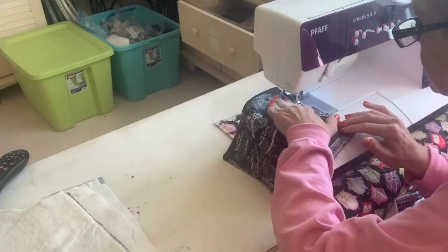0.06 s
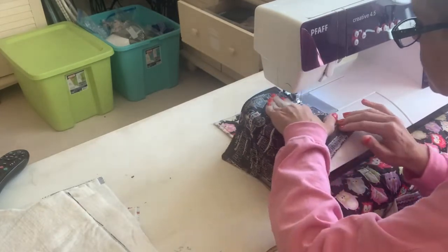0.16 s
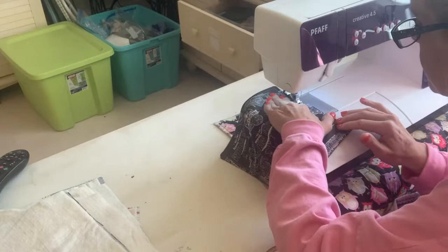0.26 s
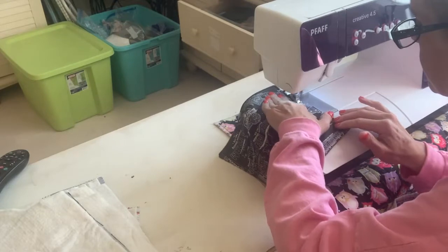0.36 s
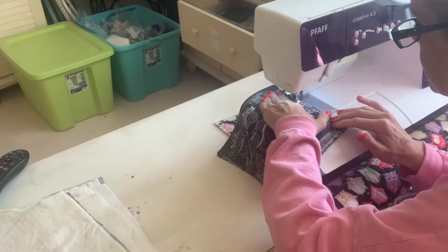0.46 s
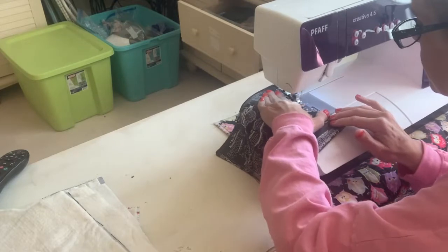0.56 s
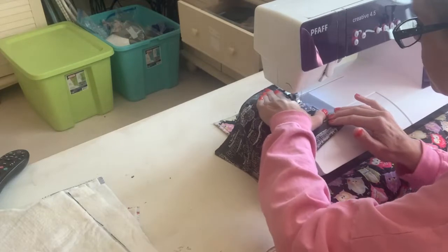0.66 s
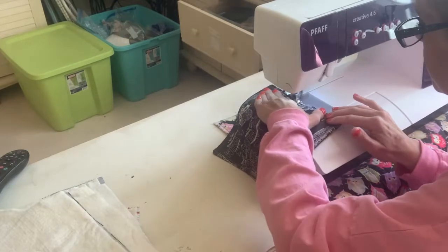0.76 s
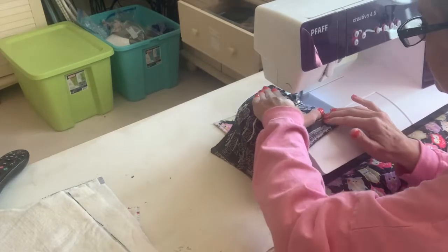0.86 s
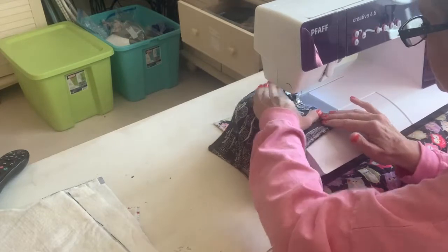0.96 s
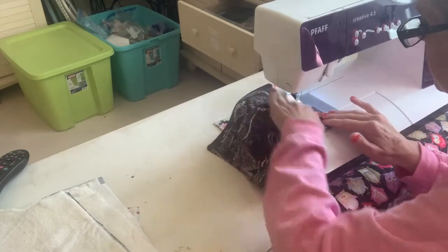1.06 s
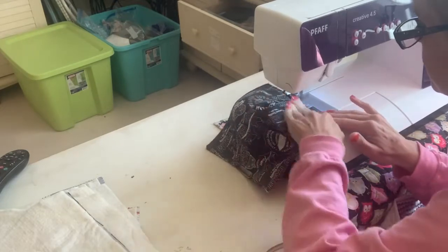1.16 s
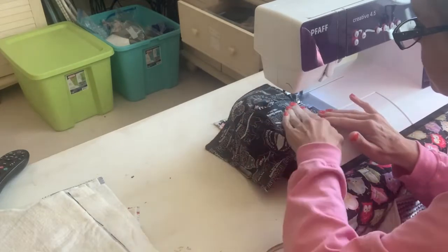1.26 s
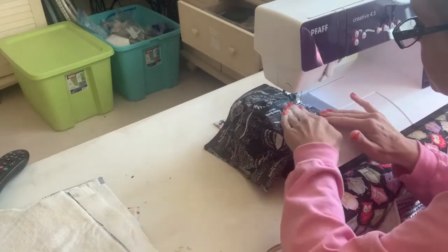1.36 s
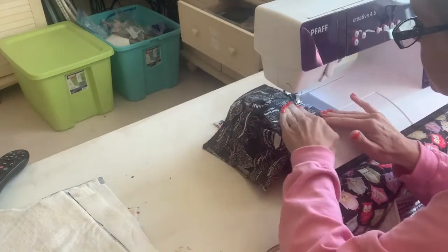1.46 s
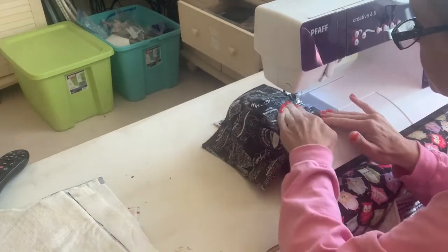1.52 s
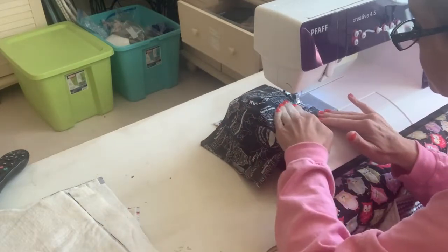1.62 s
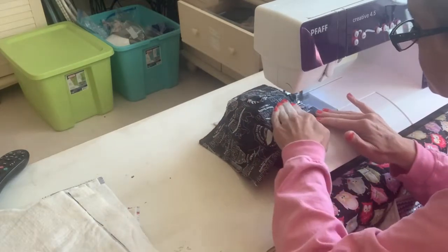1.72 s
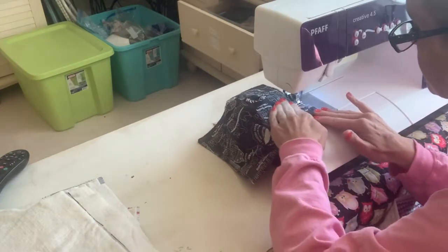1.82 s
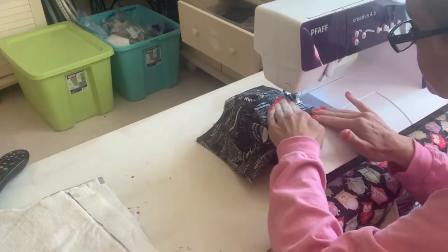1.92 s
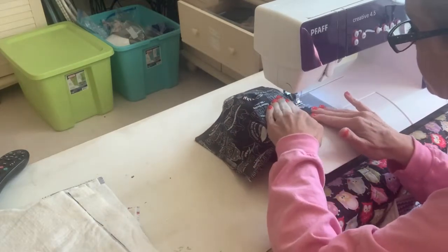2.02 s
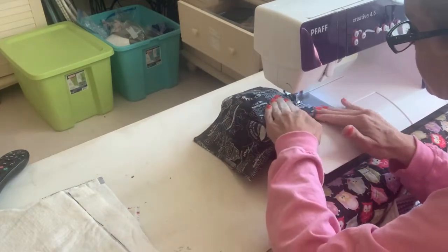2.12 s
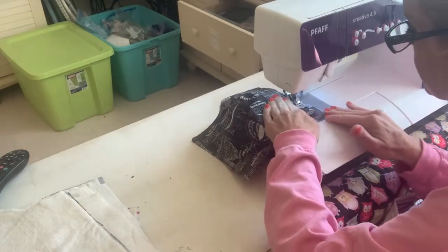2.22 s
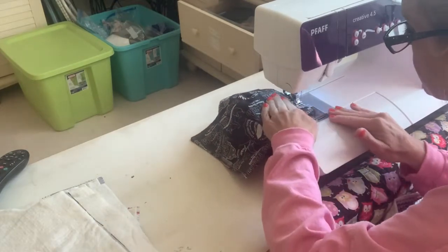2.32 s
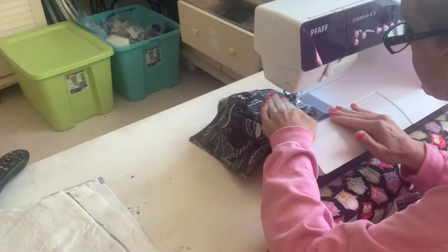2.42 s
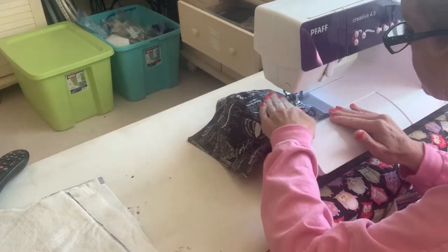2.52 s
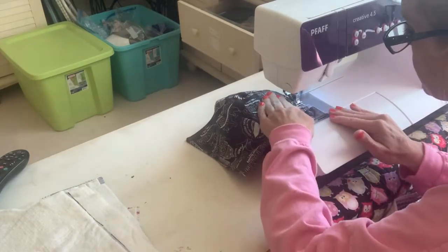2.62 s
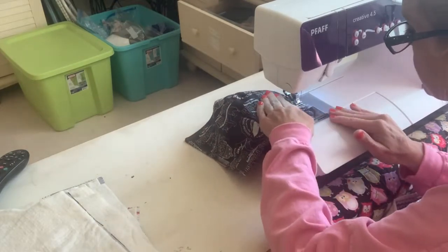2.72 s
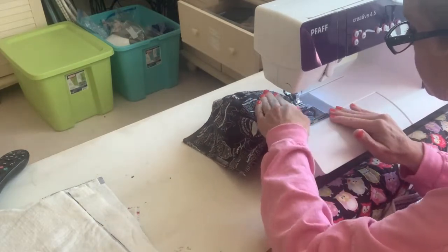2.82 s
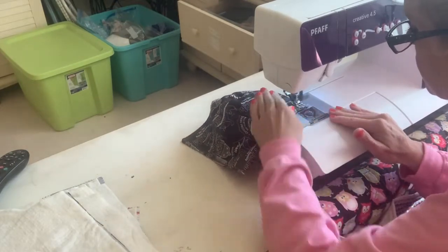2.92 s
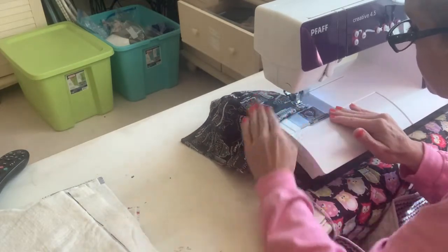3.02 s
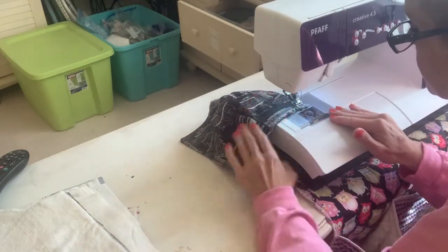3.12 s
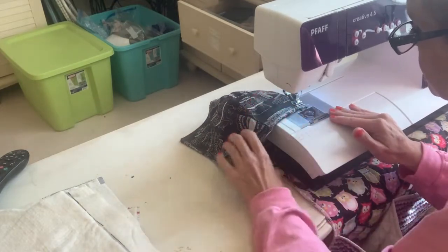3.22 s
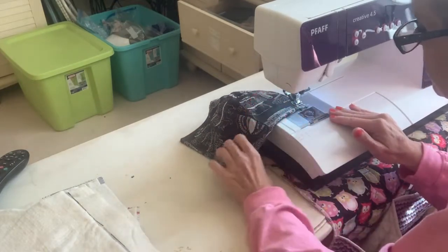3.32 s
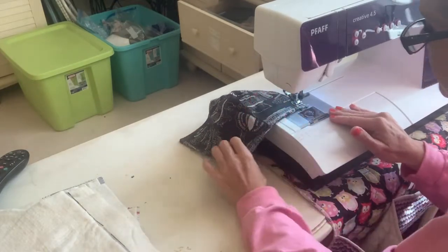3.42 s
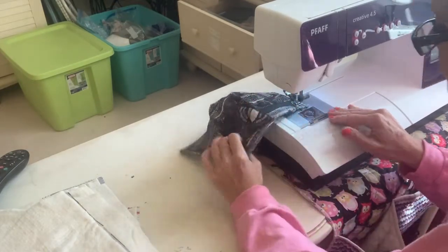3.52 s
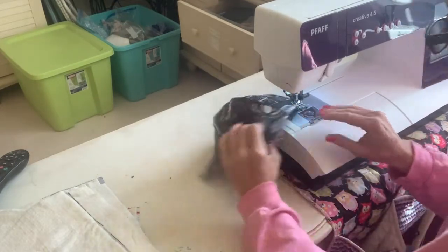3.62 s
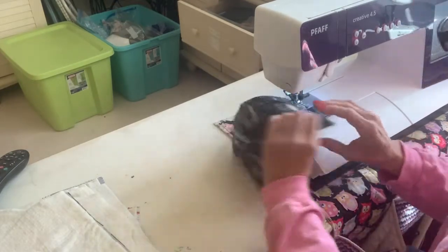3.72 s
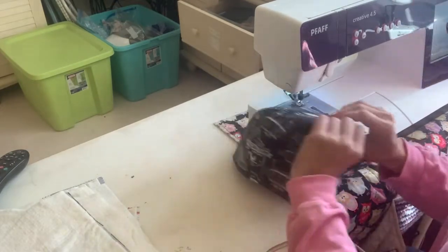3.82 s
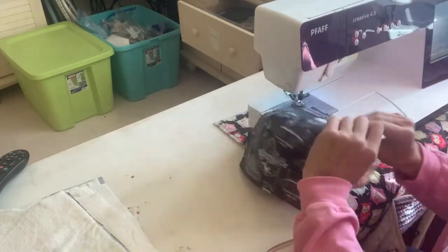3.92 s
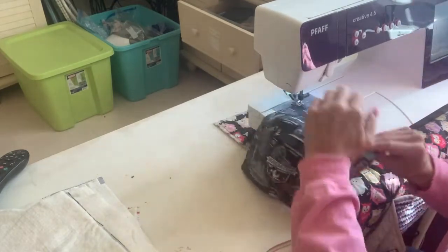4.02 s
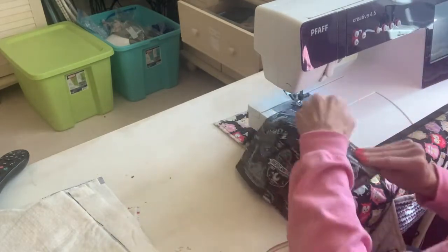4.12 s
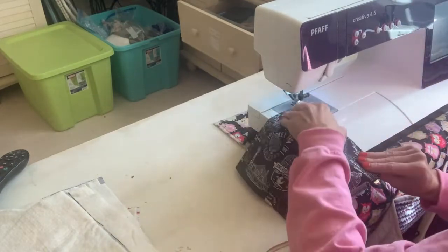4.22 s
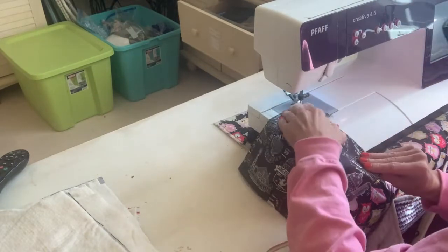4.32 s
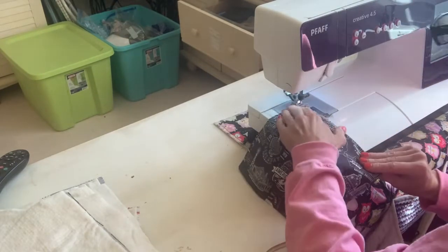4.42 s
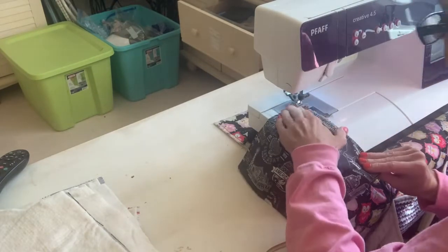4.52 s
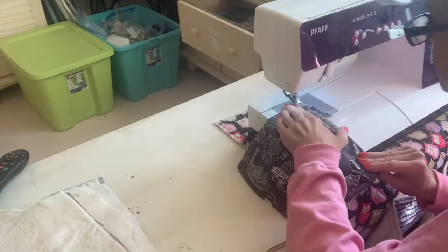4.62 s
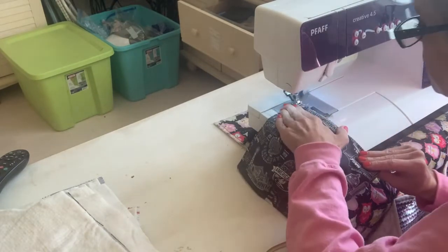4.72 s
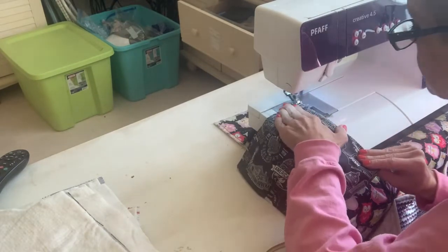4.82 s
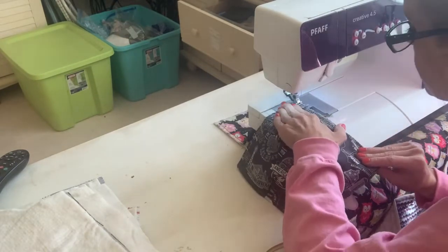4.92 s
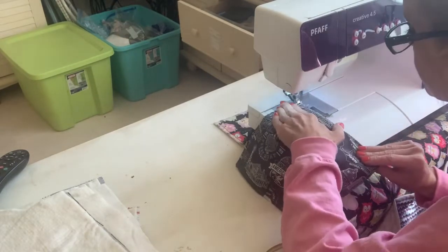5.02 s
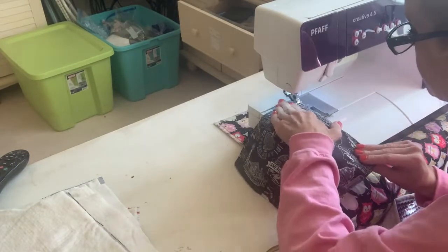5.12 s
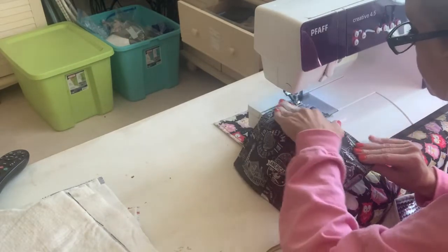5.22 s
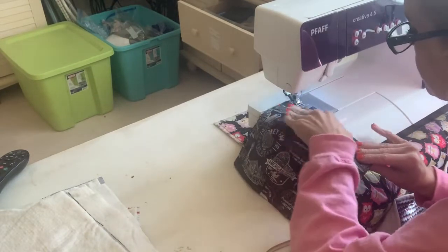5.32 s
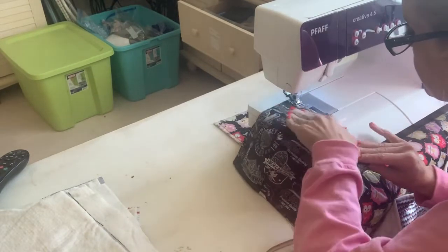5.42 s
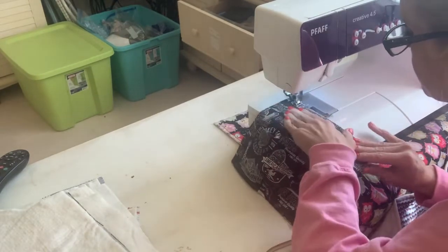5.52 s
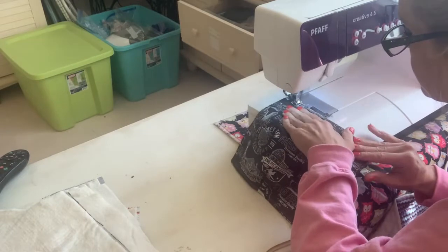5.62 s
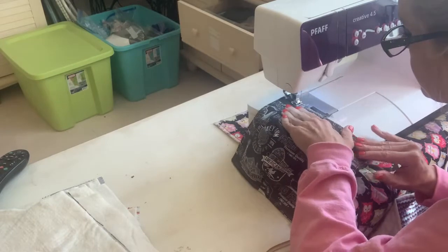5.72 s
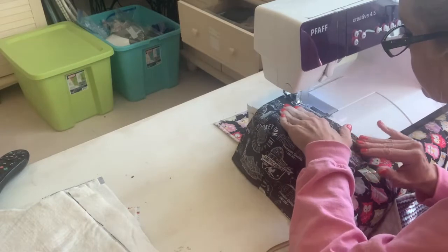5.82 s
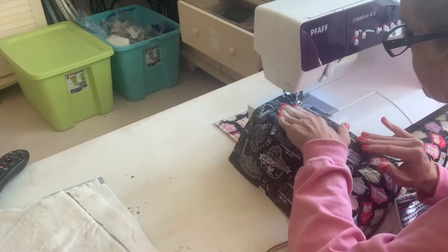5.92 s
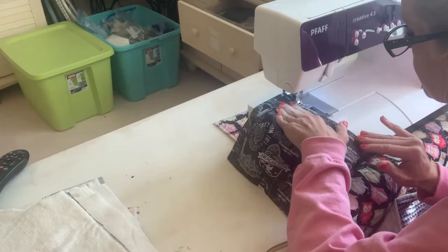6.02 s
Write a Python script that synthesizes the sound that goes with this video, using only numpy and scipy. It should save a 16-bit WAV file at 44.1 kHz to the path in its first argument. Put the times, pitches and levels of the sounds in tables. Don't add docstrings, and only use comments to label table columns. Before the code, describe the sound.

Close indoor stereo of a domestic sewing machine stitching fast and evenly, a dense rattle with motor whine and bright thread ticking. Around three seconds it brakes quickly to a stop. Hands drag cloth over the table and machine parts clack, then the motor winds up to the same steady rattle. The machine is stronger and brighter on the left, duller and more scattered on the right.

```python
import sys
import numpy as np
from scipy import signal
from scipy.fft import rfft, irfft, next_fast_len
from scipy.io import wavfile
from scipy.ndimage import uniform_filter1d, map_coordinates

SR = 44100
rng = np.random.default_rng(int(sys.argv[2]) if len(sys.argv) > 2 else 0)


def transcribe(signal):
    frames = np.atleast_2d(signal).T
    limited = np.clip(frames, -1, 1)
    pcm = np.round(limited * 32767).astype(np.int16)
    wavfile.write(sys.argv[1], SR, pcm)


def rack_gain(trim_db):
    fader = np.asarray(trim_db, float)
    return 10 ** (fader / 20)


N = 267246


def unit(x):
    return x / np.sqrt(np.mean(x ** 2) + 1e-20)


def along(points, hz):
    f, v = np.transpose(points)
    return np.interp(np.log(hz + 1), np.log(f + 1), v)


def wobble(rate_hz):
    knots = rng.standard_normal(int(N * rate_hz / SR) + 4)
    return map_coordinates(knots, [np.arange(N) * rate_hz / SR])


def filtered(x, response):
    m = next_fast_len(N + SR // 2)
    return irfft(rfft(x, m) * response(np.fft.rfftfreq(m, 1 / SR)), m)[..., :N]


def lowpassed_noise(corner_hz, power, shape=N):
    return filtered(rng.standard_normal(shape), lambda hz: 1 / (1 + (hz / corner_hz) ** power))


def noise(spectrum, grain_db):
    grains = rng.standard_normal(N) * rack_gain(grain_db * wobble(400))
    return unit(filtered(grains, lambda hz: rack_gain(along(spectrum, hz))))


def pair(spectrum, shared, grain_db):
    a, b = noise(spectrum, grain_db), noise(spectrum, grain_db)
    u = np.arccos(np.clip(shared, -1, 1)) / 2
    return np.array([np.cos(u) * a + np.sin(u) * b, np.cos(u) * a - np.sin(u) * b])


# (frequency [Hz], density [dB per Hz])
HISS_SPECTRUM = [(180, -32), (300, -4.5), (600, -16.5), (1060, -15.5), (2640, -21.5), (5000, -23.5),
                 (7700, -30), (9000, -37), (10500, -33), (14400, -34)]
HISS_DB = -77


def hiss():
    return rack_gain(HISS_DB) * pair(HISS_SPECTRUM, .05, 0)


# (frequency [Hz], density [dB per Hz])
DRAG_SPECTRUM = [(80, -21), (140, 3), (200, -0.5), (300, -2.5), (450, -9.5), (650, -13), (900, -29),
                 (1200, -56)]
# (frequency [Hz], density [dB per Hz])
RUSTLE_SPECTRUM = [(470, -9), (800, -1.5), (1020, -6), (1480, -12), (2210, -21), (7000, -47), (9100, -66),
                   (15400, -120)]
# (start [s], hold [s], fade [dB/s], drag level [dB], rustle level [dB])
HAND_STROKES = [
    (3.1, .14, 150, -56, -72),
    (3.3, 0.26, 100, -61.5, -76),
    (3.658, 0.16, 110, -56.5, -63),
    (3.85, .01, 150, -54, -76),
    (4.38, .005, 600, -58, -79),
    (4.4, .08, 300, -68, -81),
    (4.524, .04, 300, -61, -53),
    (4.622, .003, 500, -49.5, -55),
    (4.694, .01, 116, -51.5, -57),
    (4.872, 0.0028, 700, -41, -42.5),
]
REST_DRAG_DB, REST_RUSTLE_DB = -83.5, -92


def cloth():
    t = np.arange(N) / SR
    drag, rustle = rack_gain(REST_DRAG_DB), rack_gain(REST_RUSTLE_DB)
    for s, hold_s, fade, drag_db, rustle_db in HAND_STROKES:
        outside_s = np.clip(s - t, 0, None) + np.clip(t - s - hold_s, 0, None)
        stroke = rack_gain(-fade * outside_s)
        drag = np.hypot(drag, rack_gain(drag_db) * stroke)
        rustle = np.hypot(rustle, rack_gain(rustle_db) * stroke)
    friction = drag * rack_gain(2.0 * wobble(25.09)) * pair(DRAG_SPECTRUM, 0.066, 0.59)
    return friction + rustle * rack_gain(-5.0) * pair(RUSTLE_SPECTRUM, .15, 3.2)


# (frequency [Hz], density [dB per Hz])
RUMBLE_SPECTRUM = [(12, -40), (22, -21), (35, -9), (65, -1.5), (80, -2.5), (100, -5), (115, -6), (160, -23),
                   (250, -80)]
RUMBLE_DB, RUMBLE_REST_DB, RUMBLE_POWER = -41.5, -70, 2.75
RUMBLE_RING_S = 0.073


def table(pace):
    force, keep = pace ** RUMBLE_POWER, np.exp(-1 / (RUMBLE_RING_S * SR))
    sway = np.maximum(force, signal.lfilter([1 - keep], [1, -keep], force))
    shake = rack_gain(RUMBLE_REST_DB) + rack_gain(RUMBLE_DB + 0.41 * wobble(2.3)) * sway
    rumble = shake * pair(RUMBLE_SPECTRUM, 0.65, 0)
    port_phase = np.array([[-.55], [.55]])
    return filtered(rumble, lambda hz: np.exp(1j * port_phase) * (hz > 0))


# (frequency [Hz], t60 [s])
ROOM_T60 = [(200, 0.51), (2000, 0.25), (8000, 0.11)]


def tail(seconds, scale):
    hz, t, z = signal.stft(rng.standard_normal(round(seconds * SR)), SR, nperseg=256)
    decay = rack_gain(-60 * t / (scale * along(ROOM_T60, hz))[:, None])
    echo = signal.istft(z * decay, SR, nperseg=256)[1]
    return echo / np.linalg.norm(echo)


# (time [s], frequency [Hz], level [dB], t60 [s])
PART_RINGS = [(3.635, 2830, -62, .04), (3.7, 478, -50, 0.39), (3.791, 91, -45, 0.14),
              (3.816, 3020, -50, 0.05), (3.817, 5100, -58, .06), (3.818, 1126, -51, 0.13),
              (3.819, 1533, -49.5, 0.11), (3.82, 1910, -55, 0.09), (3.826, 111, -36.5, .11),
              (3.83, 297, -36.5, 0.09), (4.114, 1120, -73, .12), (4.115, 415, -62, .12),
              (4.04, 377, -74, .4), (4.389, 905, -61, 0.6), (4.522, 1100, -40, 0.069),
              (4.53, 1186, -39.5, 0.068), (4.5, 483, -48.5, .12), (4.613, 300, -57, 0.069),
              (4.68, 556, -45, 0.22), (4.815, 2290, -48, .08), (4.86, 340, -36, 0.059)]


def rings():
    out, t = np.zeros(N + SR), np.arange(SR // 2) / SR
    for s, hz, db, t60 in PART_RINGS:
        flutter = np.cumsum(.0009 * np.sqrt(hz) * rng.standard_normal(len(t)))
        envelope = rack_gain(db - 60 * t / t60) * (1 - np.exp(-t / 0.00052))
        out[round(s * SR):][:len(t)] += envelope * np.sin(2 * np.pi * hz * t + flutter)
    return out


# (frequency [Hz], width [Hz], level [dB])
CASE_MODES = [(1200, 200, 0), (1650, 200, -6), (2450, 250, -14), (3050, 150, -8), (4000, 250, -3),
              (5300, 150, -6), (6250, 200, -3), (7700, 200, -12)]


def case(f):
    return .7 + sum(rack_gain(.5 * db) * 1j * f * w / (c * c - f * f + 1j * f * w) for c, w, db in CASE_MODES)


# (time [s], peak [dB], thump [dB], bright [dB])
PART_CLACKS = [(1.633, -29, -6.5, -4.5), (1.868, -28.5, -6, -28), (3.121, -39, -19, -4),
               (3.634, -51, 5, -20), (3.775, -55.5, -6, -10), (3.816, -45.5, -3, -7.5), (3.84, -65, 8, 4),
               (3.998, -69, 2, -30), (4.358, -44, -9, -2), (4.393, -48.5, -2, -3.5), (4.522, -48, 4, -39),
               (4.532, -42, -4, -35), (4.586, -54, -10, -35), (4.639, -52, -8, -7),
               (4.671, -41.5, -6, -6.5), (4.694, -45, -1, 3.5), (4.749, -46, 2, -6),
               (4.815, -38.5, -14, -5), (4.832, -52, -14, -12), (4.854, -39, -5, -8),
               (4.906, -40, -10, 0.5), (4.934, -44, -2, -15), (5.057, -40.5, -4, 0), (5.152, -35, -17, -7),
               (5.163, -39, -12, -19), (5.953, -25, -5.5, -11), (5.971, -24.5, -17, -17)]
CLACK_RISE_S, CLACK_T60_S = 0.0012, 0.29


def clacks():
    thumps, rattles, t = np.zeros(N + SR), np.zeros(N + SR), np.arange(SR // 2) / SR
    fade = rack_gain(-60 * t / CLACK_T60_S) * (1 - np.exp(-t / CLACK_RISE_S))
    fade = fade * (0.85 + 2.0 * rack_gain(-60 * t / 0.02))

    def burst(order, edges_hz):
        band = signal.butter(order, edges_hz, "bandpass", fs=SR, output="sos")
        return signal.sosfilt(band, fade * rng.standard_normal(len(t)))

    for s, db, thump_db, bright_db in PART_CLACKS:
        dull = np.clip(1 + bright_db / 110, .4, 1)
        low = burst(4, (220, 600))
        mid = burst(3, (900, 3300 * dull))
        high = burst(4, (3500, 7500))
        thumps[round(s * SR):][:len(t)] += rack_gain(db + thump_db + 15.5) * low
        rattles[round(s * SR):][:len(t)] += rack_gain(db) * (rack_gain(0.5) * mid + rack_gain(bright_db - 0.5) * high)
    thump = (thumps + rings())[:N]
    rattle = filtered(rattles[:N], case)
    echo = signal.fftconvolve(rack_gain(-13) * thump + rack_gain(-7) * rattle, tail(.5, 1))[:N]
    return thump + rattle + echo


FULL_SPEED = 17.491
CREEP_TURNS = .167
BRAKE_S, BRAKING = 3.01, 50
RESTART_S, SPIN_UP_S = 4.664, .22


def shaft():
    t = np.arange(N) / SR
    halt_s = BRAKE_S + FULL_SPEED / BRAKING
    first = np.clip(BRAKING * (halt_s - t), 0, FULL_SPEED)
    creep = CREEP_TURNS / (RESTART_S - halt_s) * (t > halt_s) * (t < RESTART_S)
    return first + creep + FULL_SPEED * (1 - np.exp(-np.clip(t - RESTART_S, 0, None) / SPIN_UP_S))


# (time [s], level re full running [dB])
DRIVE_EFFORT = [(0, 0), (1.16, 0), (2.82, 0), (2.9, 1), (3.04, -4.5), (3.17, -23), (3.25, -27), (3.36, -50),
                (3.42, -67), (4.58, -72), (4.62, -31), (4.704, -12), (4.838, -14), (4.896, -8.5),
                (5.054, -5), (5.152, -2.5), (5.554, 2), (6.06, 0)]


def effort():
    s, db = np.transpose(DRIVE_EFFORT)
    return np.interp(np.arange(N) / SR, s, db)


def rough_band(cycles, width_hz):
    slow = lowpassed_noise(width_hz, 2, (2, N))
    return unit(slow[0] * np.cos(2 * np.pi * cycles) + slow[1] * np.sin(2 * np.pi * cycles))


UPPER_ORDER, LOWER_ORDER = 239, 119
WHINE_DB, WHINE_HZ, WHINE_WIDTH_HZ = -47, 4040, 470
SING_DB, SING_HZ, SING_WIDTH_HZ, SING_REST_DB = -39.5, 1615, 179, -67
HUM_DB, HUM_HZ, HUM_PACE, HUM_SPREAD = -45.5, 4080, .6, .105
COAST_SHIFT, COAST_DB = 0.19, -7


def motor(turn, pace, effort_db):
    coasting = uniform_filter1d(1. * (np.gradient(pace) < 0), size=1500)
    lower, lower_hz = LOWER_ORDER * turn, LOWER_ORDER * FULL_SPEED * pace
    whine_level = rack_gain(WHINE_DB + 0.63 * wobble(75) + .3 * effort_db)
    opening = 1 / (1 + ((2 * lower_hz - WHINE_HZ) / WHINE_WIDTH_HZ) ** 4)
    whine = whine_level * opening * rough_band(UPPER_ORDER * turn, 200)
    passing = np.exp(-.5 * ((lower_hz - SING_HZ) / SING_WIDTH_HZ) ** 2)
    swell = rack_gain(SING_REST_DB) + rack_gain(SING_DB + 2.7 * wobble(30)) * passing
    sing = swell * (.4 * np.sin(2 * np.pi * lower) + .9 * rough_band(lower, 60))
    near = np.exp(-.5 * ((pace - HUM_PACE - COAST_SHIFT * coasting) / HUM_SPREAD) ** 2)
    hum = rack_gain(HUM_DB) * near * rough_band(HUM_HZ * np.arange(N) / SR, 170)
    return rack_gain(COAST_DB * coasting) * (whine + rack_gain(.95 * effort_db) * sing) + rack_gain(0.86 * effort_db) * hum


def bump(turn, centre, width):
    return np.exp(-.5 * (((turn - centre + .5) % 1 - .5) / width) ** 2)


# (shaft angle [turns], level [dB])
SHAFT_KNOCKS = [
    (.37, -4),
    (.8, -6),
    (0.0501, -5.5),
]


def blows(turn):
    return sum(rack_gain(db) * bump(turn, angle, 0.03) for angle, db in SHAFT_KNOCKS)


SHAFT_ORDERS = [-50, -46, -62, -47, -57, -49, -51, -55, -56, -53, -45, -53, -52, -54, -70, -53, -54, -58,
                -51, -50, -55, -52, -50, -54, -60, -58, -54, -55, -66, -64, -60, -53, -65, -59, -52, -57,
                -57, -65, -66, -67, -68, -63, -61, -63, -70, -62, -62, -68, -70, -68, -72, -63, -68, -62,
                -63, -63, -62]


def orders(turn):
    angle, db = np.transpose(SHAFT_KNOCKS)
    spectrum = np.zeros(1025, complex)
    k = np.arange(len(SHAFT_ORDERS)) + 5
    knocks = (rack_gain(db) * np.exp(-2j * np.pi * k[:, None] * angle)).sum(axis=1)
    phase = np.angle(knocks) - 2.562 * np.log(k) + 0.55 * rng.standard_normal(len(k))
    spectrum[k] = rack_gain(SHAFT_ORDERS) * np.exp(1j * phase)
    return np.interp(turn % 1, np.linspace(0, 1, 2048), unit(irfft(spectrum)))


# (frequency [Hz], density [dB per Hz])
FRAME_SPECTRUM = [(90, -32), (135, -0.5), (200, -7), (260, -4), (330, -6.5), (420, -4), (560, -9),
                  (680, -3.5), (800, -7.5), (1000, -12.5), (1400, -65)]
FRAME_DB, FRAME_GROWS = -42.5, 0.77


def frame(turn, pace, effort_db):
    hum = rack_gain(6.0) * pace ** 2 * orders(turn) * rack_gain(0.88 * wobble(4.57))
    rough = rack_gain(2.0) * noise(FRAME_SPECTRUM, 1.5) * (1 + 0.43 * blows(turn))
    return rack_gain(FRAME_DB + FRAME_GROWS * effort_db) * (hum + rough)


# (frequency [Hz], density [dB per Hz])
CLATTER_SPECTRUM = [(470, -39), (800, -17), (951, -15.5), (1040, -1), (1200, 0.5), (1630, -5), (2060, -3),
                    (3130, -12), (3720, -9), (4100, -9), (4800, -16.5), (6240, -44), (10600, -120)]
CLATTER_DB, CLATTER_GROWS = -39, 1.03


def clatter(turn, effort_db):
    swell = 1 + .45 * blows(turn) + .35 * bump(turn, .75, .1)
    return rack_gain(CLATTER_DB + CLATTER_GROWS * effort_db) * unit(noise(CLATTER_SPECTRUM, 2.2) * swell)


# (frequency [Hz], level [dB], t60 [s])
HOOK_MODES = [(5300, 0, .018), (5700, -2, .016), (6300, -5, .015), (4200, -12, .015), (7600, -17, .01)]


def hook(turn):
    at = np.flatnonzero(np.diff(np.floor(turn)))
    kicks, t = np.zeros(N), np.arange(SR // 40) / SR
    chance = rng.standard_normal((len(at), 2))
    jittered = at + np.round(25 * chance[:, 0]).astype(int) - 110
    kicks[np.clip(jittered, 0, N - 1)] = rack_gain(1.3 * chance[:, 1])
    ring = sum(rack_gain(db - 60 * t / t60) * np.sin(2 * np.pi * hz * t) for hz, db, t60 in HOOK_MODES)
    ring = ring * (1 - np.exp(-t / .001))
    return signal.fftconvolve(kicks, ring)[:N] * (1 + .4 * unit(lowpassed_noise(500, 4)))


# (frequency [Hz], density [dB per Hz])
THREAD_SPECTRUM = [(3000, -46), (4700, -10), (5000, -5.5), (5300, 2.5), (5600, -2.5), (6300, -0.5),
                   (7000, -7), (8000, -15), (9500, -23), (10300, -27), (11000, -33), (12000, -44),
                   (14400, -73)]
THREAD_DB, THREAD_GROWS = -46.5, 1


def thread(turn, effort_db):
    pull = 1 + 1.35 * rack_gain(1.1 * wobble(12)) * bump(turn, .69, .095)
    swish = noise(THREAD_SPECTRUM, 2.2) * pull
    return rack_gain(THREAD_DB + THREAD_GROWS * effort_db) * unit(swish + rack_gain(19.5) * hook(turn))


def machine(turn, pace, effort_db):
    return frame(turn, pace, effort_db) + clatter(turn, effort_db) + thread(turn, effort_db)


def scatter(x, every_s):
    hop = round(every_s * SR)
    out, padded = np.zeros(N + 3 * hop + SR), np.pad(x, (hop, 2 * hop))
    window = np.sin(np.pi * np.arange(2 * hop) / (2 * hop))
    for start in range(0, N + hop, hop):
        piece = signal.fftconvolve(padded[start:start + 2 * hop] * window, tail(.4, 0.91))
        out[start:][:len(piece)] += piece
    return out[hop:hop + N]


# (frequency [Hz], left minus right [dB])
PORT_SHADE = [(60, 8), (100, 3), (170, 6), (300, 11.5), (510, 4.5), (860, 5), (1470, 13.5), (2500, 13.5),
              (4270, 15.5), (7270, 12)]
# (frequency [Hz], left lead [rad])
PORT_LEAD = [(0, -.8), (100, -1.2), (150, -2), (1030, -1.5), (1290, -1.9), (1720, .5), (2070, .7),
             (2580, 4.5), (2840, 4.1), (3190, 3.8), (3880, .6), (4390, .6), (5680, -4.9), (6800, -6.5),
             (7410, -8.5)]
# (frequency [Hz], left-right likeness [0..1])
PORT_LIKENESS = [(60, .8), (300, .92), (700, .93), (1050, .6), (2500, .15), (4500, .45), (9000, .1)]


def ports(x):
    def alike(hz):
        return np.clip(along(PORT_LIKENESS, hz), 0, 1)

    def path(hz):
        return rack_gain(-along(PORT_SHADE, hz)) * np.exp(-1j * np.interp(hz, *np.transpose(PORT_LEAD)))

    direct = filtered(x, lambda hz: alike(hz) * path(hz))
    diffuse = filtered(scatter(x, every_s=.25), lambda hz: np.sqrt(1 - alike(hz) ** 2) * path(hz))
    return np.array([x, direct + diffuse])


FIRST_TURN = .035


def scene():
    speed = shaft()
    turn, pace = FIRST_TURN + np.cumsum(speed) / SR, speed / FULL_SPEED
    effort_db = effort()
    running = machine(turn, pace, effort_db) + motor(turn, pace, effort_db)
    return ports(running + clacks()) + table(pace) + cloth() + hiss()


def band_limit(x):
    return signal.sosfilt(signal.butter(12, 14450, fs=SR, output="sos"), x)


def record(dry):
    return band_limit(dry)


dry = scene()
out = record(dry)
transcribe(out)
```